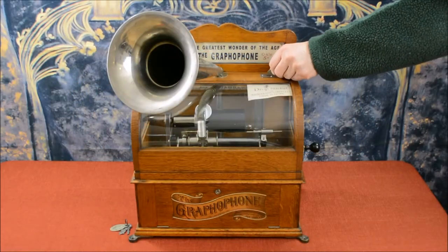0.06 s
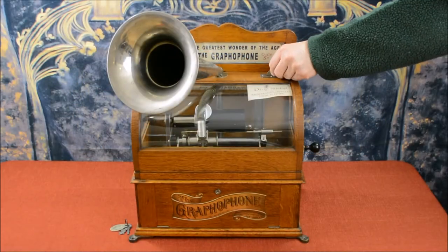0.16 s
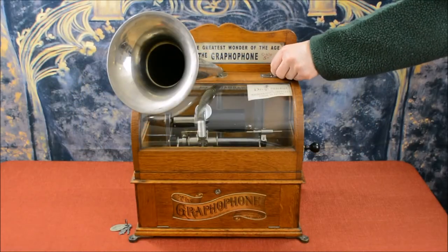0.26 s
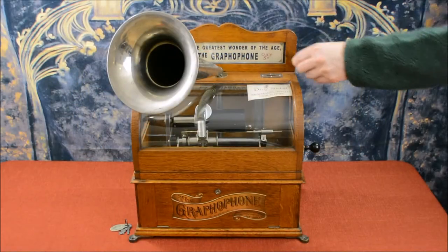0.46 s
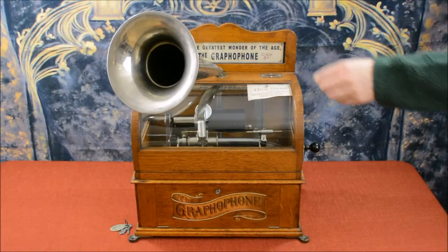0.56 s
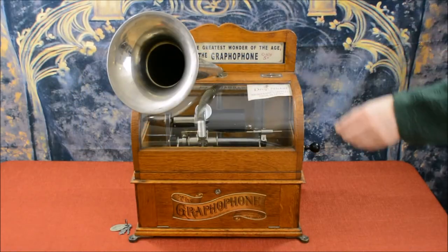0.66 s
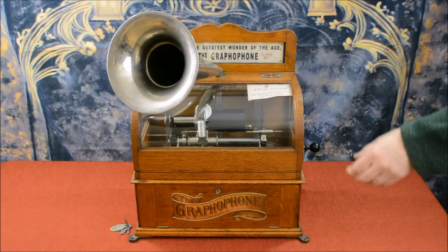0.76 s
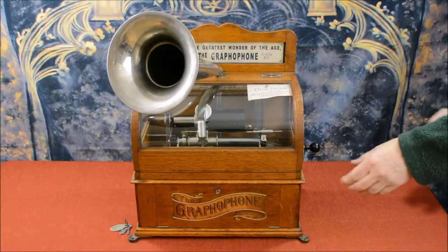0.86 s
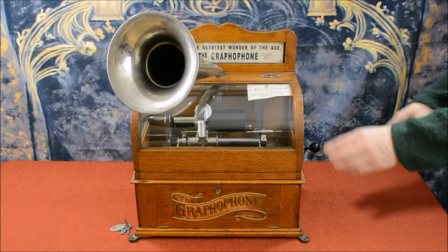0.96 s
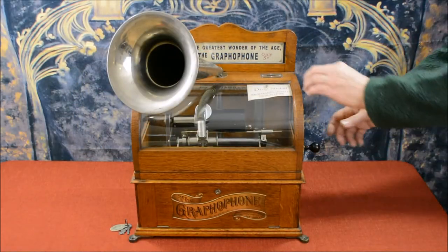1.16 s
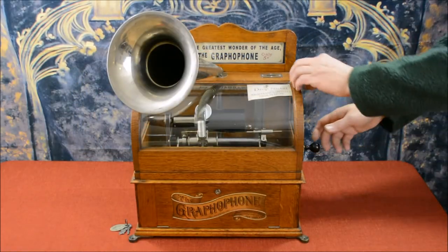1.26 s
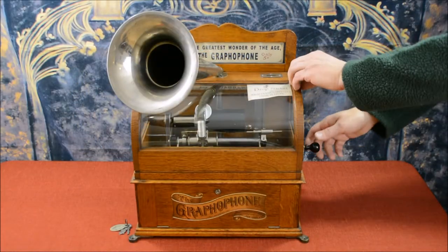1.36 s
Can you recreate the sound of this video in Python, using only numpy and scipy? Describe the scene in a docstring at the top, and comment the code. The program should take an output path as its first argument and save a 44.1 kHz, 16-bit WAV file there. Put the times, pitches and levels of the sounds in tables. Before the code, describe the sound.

A coin clicks through a slot, clatters down a metal chute and lands with a clunk.

```python
"""In a quiet room, a coin is pushed into an old coin-operated phonograph.
First its edge scrapes faintly into the slot and clicks through. Then it clatters down
a metal chute and rings as it falls free. Last, it lands with a clunk on the mechanism:
the wooden case booms softly and a small metal part pings while the coin rocks to rest."""
import sys
import numpy as np
from scipy import signal
from scipy.fft import rfft, irfft, next_fast_len
from scipy.io import wavfile

SR = 44100
rng = np.random.default_rng(int(sys.argv[2]) if len(sys.argv) > 2 else 0)


def store_wav(level_fs):
    """Save 16-bit WAV to argv[1]."""
    pcm = np.round(np.clip(np.atleast_2d(level_fs), -1, 1) * 32767)
    wavfile.write(sys.argv[1], SR, pcm.T.astype(np.int16))


N = 61739
TIME = np.arange(N) / SR
CHATTER_SAMPLES, RING_SAMPLES = 6144, 24576

# how much left and right differ in the coin's scrape and clatter: pitch_hz, side_db
CLATTER_WIDTH = [(200, -28.5), (2000, -27.5), (4500, -20), (9000, -9.5)]


def amp(db):
    """Turns decibels into a number to multiply a sound by."""
    return 10 ** (np.asarray(db) / 20)


def evened(x):
    """Scales a sound so that its average strength (rms) is 1."""
    return x / np.sqrt(np.mean(x ** 2) + 1e-20)


def value_at(points, hz):
    """Looks up a pitch in a table, blending between rows on a musical (log) scale."""
    pitches, values = np.transpose(points)
    return np.interp(np.log(hz + 1), np.log(pitches + 1), values)


def add(mix, start_s, sound):
    """Adds a sound to the mix at its start time."""
    part = mix[:, max(round(start_s * SR), 0):][:, :sound.shape[1]]
    part += sound[:, :part.shape[1]]


def coloured(x, colour, tilt_db=0):
    """Turns each pitch up or down by a table; tilt_db brightens by that much per octave."""
    length = x.shape[-1]
    size = next_fast_len(length + 2048)
    hz = abs(np.fft.fftfreq(size, 1 / SR))
    octaves = np.log2(np.maximum(hz, 400) / 2000)
    gain = amp(value_at(colour, hz) + tilt_db * octaves)
    response = np.exp(np.conj(signal.hilbert(np.log(gain))))  # nothing sounds before its cause
    return irfft(rfft(x, size) * response[:size // 2 + 1], size)[..., :length]


def stereo_noise(width, size=N):
    """Hiss with a middle that both ears share and a weaker side that makes them differ."""
    mid, side = rng.standard_normal((2, size))
    side = coloured(side, width)
    return np.array([mid + side, mid - side])


def dying(x, decay, hold_s=0):
    """Holds a sound, then lets each pitch fade; fade_s is the time it takes to drop 60 dB."""
    hz, t, spectrum = signal.stft(x, SR, nperseg=128, noverlap=96)
    fade_s = np.maximum(value_at(decay, hz), 1e-3)[:, None]
    fade = amp(-60 * np.maximum(t - hold_s, 0) / fade_s)
    return signal.istft(spectrum * fade, SR, nperseg=128, noverlap=96)[1][:, :N]


def ringing(notes, rise_s, size=RING_SAMPLES):
    """The notes of struck objects: pure tones that build up and die away."""
    t = TIME[:size]
    tones = sum(amp(db - 60 * t / fade_s) * np.sin(2 * np.pi * hz * t) for hz, db, fade_s in notes)
    return tones * (1 - np.exp(-t / rise_s))


def air():
    """Quiet room noise that grows a little louder near the end."""
    colour = [(20, -38.5), (45, -18.5), (62, -12.5), (110, -12), (180, -8.5), (250, -3.5), (420, -6.5),
              (650, -3), (1150, -4.5), (2000, -7), (3400, -12.5), (6500, -19.5), (10400, -24.5),
              (16000, -35)]  # tone of the noise: pitch_hz, level_db
    width = [(60, -14), (240, -4.5), (950, -2.5), (4000, -2), (15000, -1)]  # how much left and right differ: pitch_hz, side_db
    swell = [(0, -2.5), (.2, -3), (.9, -1.5), (1.0, 1), (1.4, 1)]  # slow change in loudness: time_s, change_db
    level_db = -58 + np.interp(TIME, *np.transpose(swell))
    return amp(level_db) * evened(coloured(stereo_noise(width), colour))


def room_echo(x, build_s=0.01397):
    """The many reflections of a small furnished room blur into a short tail."""
    decay = [(100, 0.476), (500, 0.548), (1200, 0.4685), (4000, 0.3636), (8000, 0.368), (14000, 0.261)]  # how long the echo lasts: pitch_hz, fade_s
    colour = [(100, -6), (500, -8), (1200, -5.5), (4000, -6), (8000, -11.5), (14000, -13)]  # how strong the echo is: pitch_hz, level_db
    width = [(100, -26), (1000, -28), (3000, -18.5), (8000, -5.5)]  # how much left and right differ: pitch_hz, side_db
    tail = dying(stereo_noise(width, RING_SAMPLES), decay)
    tail *= np.minimum(TIME[:tail.shape[1]] / build_s, 1) ** 2
    tail = coloured(tail / np.linalg.norm(tail[0]), colour)
    return signal.fftconvolve(x, tail, axes=1)[:, :N]


def scrape(level_db=-56):
    """The coin's edge rubs faintly as it slides into the slot."""
    colour = [(200, -16.5), (900, 2.5), (3000, 0), (6500, -2.5), (10000, -22.5), (16000, -30)]  # tone of the rubbing: pitch_hz, level_db
    times_s = [0.0359, 0.0601, 0.0807, 0.0856]
    stroke = np.interp(TIME, times_s, [0.203, 0.986, 0.88, 0.04])
    return amp(level_db) * stroke * evened(coloured(stereo_noise(CLATTER_WIDTH), colour))


def case_boom(start_s=0.494, level_db=-54.5, pitch_hz=86.1, fade_s=0.305):
    """The wooden case's lowest note swells and dies after the landing."""
    out = np.zeros((2, N))
    add(out, start_s, ringing([(pitch_hz, level_db, fade_s)], rise_s=0.034)[None])
    return out


def pings():
    """The coin taps a small metal part, whose three close notes make a wavering ring."""
    taps = [(.456, -52, 0.23), (.4955, -36, 0.287), (.646, -49, 0.119), (.741, -65.5, 0.138)]  # taps on the part: start_s, level_db, fade_s
    notes = np.transpose([ [5327, 5358, 5405], [0, -4.5, -9.5]])  # the part's notes: pitch_hz, level_db
    out = np.zeros((2, N))
    for start_s, level_db, fade_s in taps:
        ring = ringing([(hz, db, fade_s) for hz, db in notes], rise_s=0.00135)
        add(out, start_s, amp(level_db) * ring[None])
    return out


def coin_ring(start_s=0.3505, level_db=-35):
    """The falling coin rings brightly; its two lowest notes are so close that they throb."""
    notes = np.transpose([ [3540, 3546, 4185, 5310, 6150, 7300, 9343, 10151, 13145],
             [1.5, 2.5, -2, -7.5, -7, -15, 1.2, -0.5, -16],
             [0.7407, 0.303, 0.2024, 0.25, 0.1446, 0.2, 0.12, 0.1514, 0.2229]])  # the coin's notes: pitch_hz, level_db, fade_s
    out = np.zeros((2, N))
    add(out, start_s, amp(level_db) * ringing(notes, rise_s=0.00203, size=N)[None])
    return out


def strikes(hits, colour, decay, notes, attack_s, pan_db):
    """Each hit is a chatter of tiny contacts that shakes part and coin; returns clatter and tones."""
    clatter, tones = np.zeros((2, 2, N))
    centre_hz = np.exp(np.mean(np.log(notes[:, 0])))
    for start_s, level_db, contact_s, tilt_db, ring_db in hits:
        chatter = dying(stereo_noise(CLATTER_WIDTH, CHATTER_SAMPLES), decay, contact_s)
        chatter *= np.minimum(TIME[:chatter.shape[1]] / attack_s, 1)
        body = coloured(signal.unit_impulse(2048), colour, tilt_db)  # the part's answer to one tap
        body /= np.linalg.norm(body)
        add(clatter, start_s, amp(level_db) * signal.fftconvolve(chatter, body[None], axes=1))
        tilted = [(hz, db + tilt_db * np.log2(hz / centre_hz), fade_s) for hz, db, fade_s in notes]
        add(tones, start_s, amp(level_db + ring_db) * ringing(tilted, contact_s / 2)[None])
    return np.array([clatter, tones]) * amp([[pan_db], [-pan_db]])


def slot_clicks():
    """The coin knocks against the slot on its way through."""
    # knocks on the slot: start_s, level_db, contact_s, tilt_db_per_octave, ring_db
    hits = [(.083, -39.5, 0.00414, -0.59, -13.5), (.203, -44.5, 0.0051, 0.5, 2),
            (.2362, -50, 0.0049, -1.5, -1.5), (.2398, -26.5, 0.00387, 0.71, -1)]
    colour = [(50, -38.5), (260, -22), (380, -12), (650, -2), (1300, -2), (2100, -5), (2700, 0.5),
              (3500, 2.5), (4500, -5.5), (5000, 0), (6600, -6), (8400, -1.5), (9200, -9), (10200, -4.5),
              (13000, -24), (16000, -31.5)]  # tone of a click: pitch_hz, level_db
    decay = [(500, 0.135), (3000, 0.0706), (10000, 0.0251)]  # how long a click lasts: pitch_hz, fade_s
    # notes of the slot and the coin ringing in it: pitch_hz, level_db, fade_s
    notes = np.transpose([ [1120, 1565, 2625, 2930, 3590, 3614, 3685, 5020, 7540, 8370, 13165],
             [-21, -13, -20, -22.5, -7, -8, -9.5, -13, -3, -20.5, -10.5],
             [0.65, 0.2756, 0.48, 0.39, 0.0924, 0.1461, 0.14, 0.1152, 0.06, 0.0017, 0.12]])
    return strikes(hits, colour, decay, notes, attack_s=0.000483, pan_db=0.25)


def chute_clatter():
    """The coin bounces down the metal chute."""
    # bounces in the chute: start_s, level_db, contact_s, tilt_db_per_octave, ring_db
    hits = [(.3172, -35, 0.00196, 1, -2), (.3205, -35, 0.00394, -0.68, -13),
            (.3248, -25, 0.0013, -0.56, -8), (.3274, -25, 0.00196, 2, 1.5), (.335, -37, 0.0034, -2.5, -3.5),
            (.3495, -32.5, 0.00848, 3.5, -4.5), (.363, -44.5, 0.0055, .5, -15.5),
            (.391, -53, 0.0052, 1, -11), (.445, -50, 0.0157, 3, -2.5), (.455, -44.5, 0.0089, 2, -2.5)]
    colour = [(40, -46), (110, -33.5), (200, -14.5), (400, -12), (800, -2.5), (1250, 0), (1650, 5),
              (2500, -8), (3400, 2), (4200, -3), (4650, -9.5), (5300, -3.5), (6100, -5.5), (6700, -9.5),
              (7450, -3.5), (8100, -10), (10300, -9.5), (13000, -27), (16000, -34)]  # tone of a bounce: pitch_hz, level_db
    decay = [(300, 0.169), (1500, 0.0495), (4000, 0.0432), (10000, 0.0403)]  # how long a bounce sounds: pitch_hz, fade_s
    # notes of the chute and the bouncing coin: pitch_hz, level_db, fade_s
    notes = np.transpose([ [345, 507, 785, 1105, 1415, 1480, 1555, 1665, 3311, 3617, 3697, 7374, 7530],
             [-26.5, -12.5, -16, -15.5, -25, -15, -12, -11.5, -23.5, -11, -14, -17.5, -8.5],
             [0.73, 0.0748, 0.0756, 0.25, 1.09, 0.2755, 0.0463, 0.02, 0.23, 0.2066, 0.1568, 0.155, 0.0851]])
    return strikes(hits, colour, decay, notes, attack_s=0.0005, pan_db=-0.34)


def landing():
    """The coin drops on the mechanism and rocks to rest, shaking the wooden case."""
    # landing and rocking knocks: start_s, level_db, contact_s, tilt_db_per_octave, ring_db
    hits = [(.4872, -41.5, .003, 1, -10), (.4895, -28.5, 0.00453, -2, -12.5),
            (.4945, -27.5, 0.00882, 1.06, 0.5), (.513, -34, 0.0039, 3, -7),
            (.528, -41.5, 0.0109, 2.5, -8.5), (.555, -47.5, 0.0033, 2, -14), (.599, -45, 0.0069, 1.5, -10),
            (.635, -43.5, 0.00655, -1.5, -4), (.647, -54.5, 0.0039, -0.5, -1),
            (.664, -56, 0.003, -2.5, -1.5), (.735, -46.5, 0.0132, -2.5, -1),
            (.781, -52.5, 0.0063, -4.5, -7), (.84, -60, .008, -3.5, -6.5)]
    colour = [(40, -38.5), (150, -23.5), (290, -11), (380, -10.5), (510, -2.5), (650, -6), (850, 0),
              (1080, 7), (1240, -13), (1650, -2), (2250, -10), (2800, -18.5), (5500, -16), (8500, -23.5),
              (11300, -20.5), (13500, -36.5), (16000, -53)]  # tone of a clunk: pitch_hz, level_db
    decay = [(200, 0.144), (1000, 0.0796), (4000, 0.0796), (10000, 0.0616)]  # how long a clunk lasts: pitch_hz, fade_s
    # notes of the case and the coin's high ring: pitch_hz, level_db, fade_s
    notes = np.transpose([ [275, 394, 507, 728, 838, 923, 1049, 1086, 1546, 1641, 1740, 2936, 10920, 13145],
             [-25, -18.5, -7, -11, -7.5, -12.5, -11, -19, -27.5, -14.5, -22.5, -23.5, -17.5, -29],
             [0.17, 0.1616, 0.1171, 0.2375, 0.1068, 0.1431, 0.3755, 0.4635, 0.27, 0.11, 0.22, 0.55, 0.05, 0.2156]])
    return strikes(hits, colour, decay, notes, attack_s=0.00157, pan_db=-0.06)


def scene():
    """Slot, chute and landing in turn, heard in the room."""
    clatter, tones = slot_clicks() + chute_clatter() + landing()
    clatter += scrape()
    tones += coin_ring() + pings()
    echo = room_echo(clatter + amp(-9) * tones)  # the tones echo less than the clatter
    return clatter + tones + case_boom() + echo + air()


def record(dry, cutoff_hz=16200):
    """Cuts away the very highest treble."""
    lowpass = signal.firwin(511, cutoff_hz, window=("kaiser", 9), fs=SR)
    return signal.oaconvolve(dry, lowpass[None], "same")


dry = scene()
out = record(dry)
store_wav(out)
```